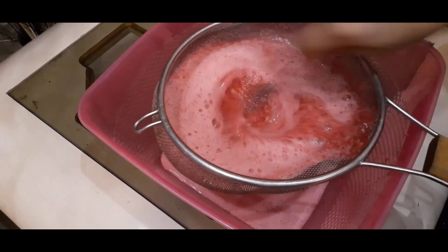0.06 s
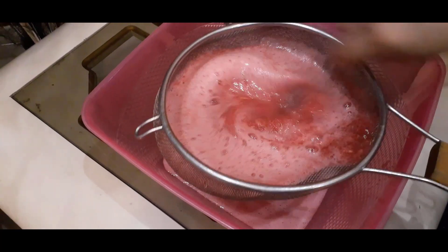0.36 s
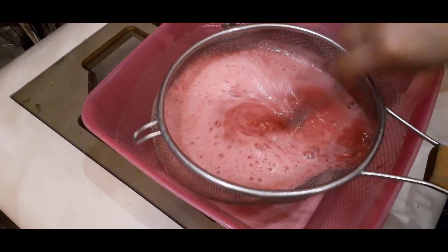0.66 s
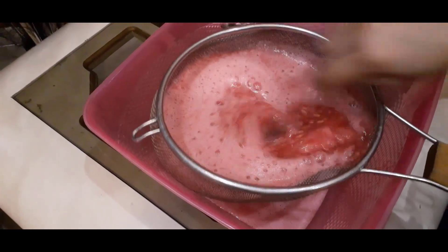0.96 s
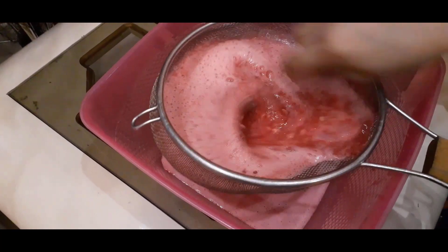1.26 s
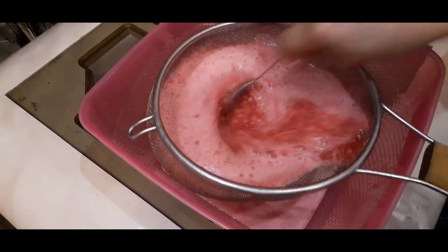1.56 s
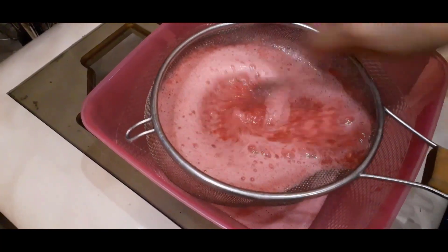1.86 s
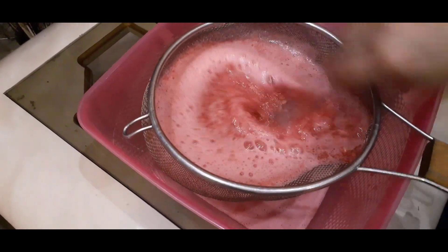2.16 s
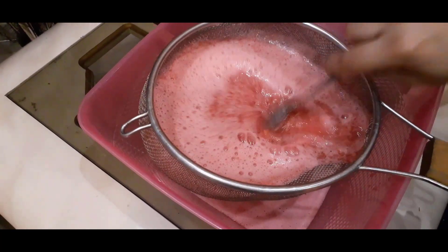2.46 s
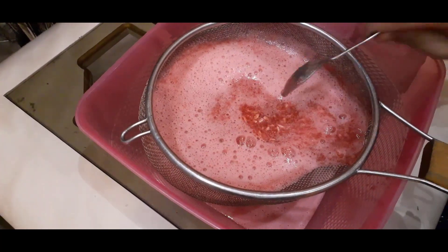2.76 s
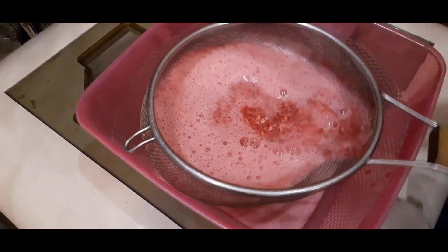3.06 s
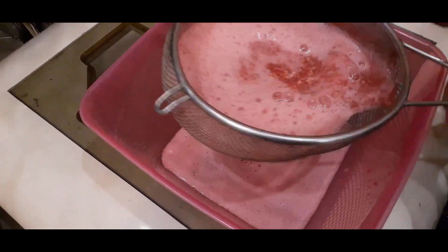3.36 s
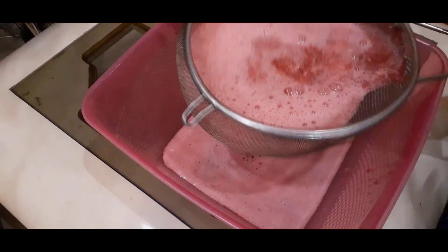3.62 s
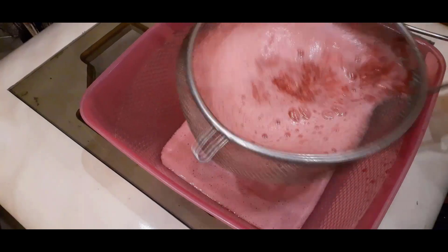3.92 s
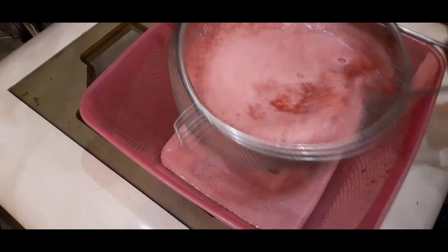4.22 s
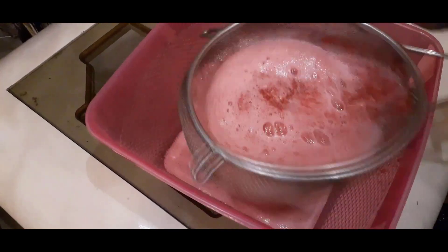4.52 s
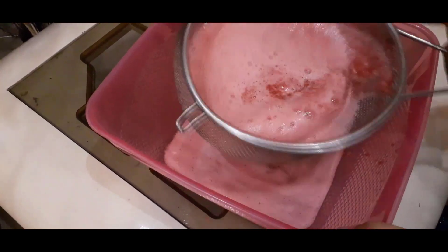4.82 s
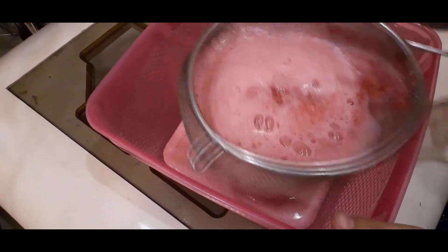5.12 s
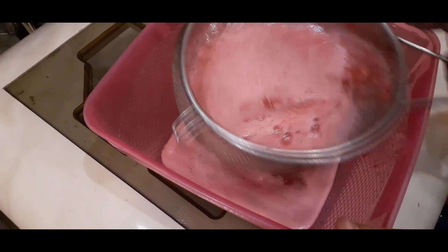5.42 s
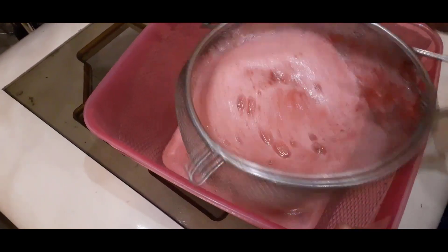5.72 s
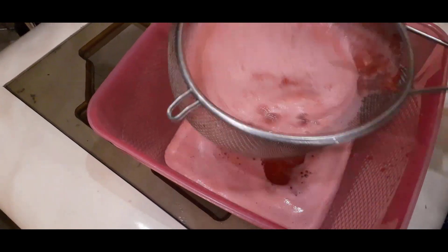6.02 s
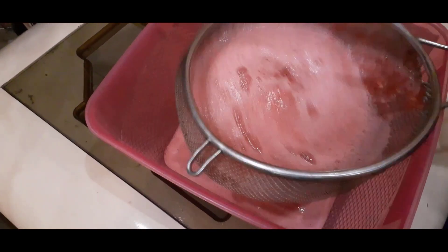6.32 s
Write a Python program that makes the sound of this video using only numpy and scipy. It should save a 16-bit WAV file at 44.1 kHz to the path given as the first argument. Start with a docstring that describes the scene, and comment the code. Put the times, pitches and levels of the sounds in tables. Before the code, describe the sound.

Quick, buzzing, squelchy stirring through metal mesh stops and gives way to scattered drips and plops over a faint kitchen hum.

```python
"""Stirring fruit pulp through a strainer

A spoon stirs wet pulp in a wire strainer over a plastic basin: four turns a second, each a quick push
and a slower return. Its edge buzzes across the wires, gliding with its speed, and the pulp squelches
through. Then the strainer is lifted and rocked: blobs plop and juice drips, over a small kitchen's hum."""
import sys
import numpy as np
from scipy import signal
from scipy.fft import rfft, irfft, next_fast_len
from scipy.io import wavfile
from scipy.ndimage import uniform_filter1d

SR = 44100
rng = np.random.default_rng(int(sys.argv[2]) if len(sys.argv) > 2 else 0)


def wrap_up_sound(samples):
    """Save the sound to the file named by the first command line argument, as 16-bit audio."""
    columns = np.atleast_2d(samples).T
    # keep every value between -1 and 1, then stretch to whole-number steps
    tamed = np.clip(columns, -1, 1)
    steps = np.round(tamed * 32767).astype(np.int16)
    wavfile.write(sys.argv[1], SR, steps)


N = 281358
TIME = np.arange(N) / SR
FREQS_HZ = np.maximum(np.fft.rfftfreq(N, 1 / SR), 1)
SPOON_STOP_S = 2.36


def from_db(db):
    return 10 ** (np.asarray(db) / 20)


def unit_rms(x):
    return x / np.sqrt(np.mean(x ** 2) + 1e-20)


def curve(rows):
    """A (time_s, value) table at every sample."""
    return np.interp(TIME, *np.transpose(rows))


def spectrum_db(points, hz):
    """A (freq_hz, level_db) table at hz, falling 36 dB per octave past its ends."""
    freq_hz, level_db = np.transpose(points)
    octaves_out = np.abs(np.log2(hz / np.clip(hz, freq_hz.min(), freq_hz.max())))
    return np.interp(np.log(hz), np.log(freq_hz), level_db) - 36 * octaves_out


def coloured(x, points):
    """Minimum-phase filter with the given spectrum."""
    n = 2 * next_fast_len(x.shape[-1] // 2 + 2048)
    hz = np.maximum(np.fft.rfftfreq(n, 1 / SR), 1)
    gain = from_db(np.maximum(spectrum_db(points, hz), -80))
    cepstrum = irfft(np.log(gain))
    cepstrum[1:n // 2] *= 2
    cepstrum[n // 2 + 1:] = 0
    return irfft(rfft(x, n) * np.exp(rfft(cepstrum)), n)[..., :x.shape[-1]]


def drift(rate_hz, size=16384):
    """Smooth random wander, RMS 1."""
    hz = np.fft.rfftfreq(size, N / SR / size)
    slow = irfft(rfft(rng.standard_normal(size)) / (1 + (hz / rate_hz) ** 2))
    return np.interp(TIME, np.linspace(0, N / SR, size), unit_rms(slow))


def spread(pair, width):
    """Mid and side to left and right; width scales the side."""
    return pair[0] + width * pair[1] * np.array([[1], [-1]])


def noise(colour, width, n=N):
    """Coloured stereo noise."""
    return coloured(spread(rng.standard_normal((2, n)), width), colour)


def evened(x, window_s=0.018):
    """Hold the short-time level at 1, leaving the fine grain."""
    power = uniform_filter1d(np.mean(x, axis=0) ** 2, int(window_s * SR))
    return x / np.sqrt(np.abs(power) + 1e-14)


def grains(per_s, size_db):
    """Two streams of random impulses of uneven size and either sign."""
    out = np.zeros((2, N))
    chance = rng.random((2, N)) * SR / per_s
    born = chance < 1
    draw = 2 * chance[born] - 1
    size = np.minimum(-np.log(np.abs(draw) + 1e-12), 5)
    out[born] = np.sign(draw) * from_db(size_db * size)
    return out


def patter(colour, per_s, size_db, width):
    """Coloured stereo grains."""
    return coloured(spread(grains(per_s, size_db), width), colour)


def swells(peak_s, heights, rise_s, fall_s):
    """Sum of rounded humps; rise and fall are shared or given per hump."""
    coarse_s = TIME[::32]
    t = coarse_s - np.reshape(peak_s, (-1, 1))
    width_s = np.where(t < 0, np.reshape(rise_s, (-1, 1)), np.reshape(fall_s, (-1, 1)))
    humps = np.exp(-np.abs(t / width_s) ** 1.5)
    return np.interp(TIME, coarse_s, np.atleast_1d(heights) @ humps)


def ring(modes, t, vary_db):
    """Decaying sines of alternating sign, levels scattered by vary_db; peak 1."""
    wave = 0
    for k, (hz, db, t60_s) in enumerate(modes):
        envelope = from_db(db + vary_db * rng.standard_normal() - 60 * t / t60_s)
        wave += (-1) ** k * envelope * np.sin(2 * np.pi * hz * t)
    return wave / np.abs(wave).max()


def add(track, start_s, sound):
    start = int(np.clip(start_s * SR, 0, N - 1))
    track[..., start:start + sound.shape[-1]] += sound[..., :N - start]


def panned(x, left_over_right_db, right_lag_rad=0.0):
    """Level difference and lag between the sides per frequency, at constant power."""
    ratio = from_db(left_over_right_db)
    right = np.ones_like(ratio) * np.exp(-1j * right_lag_rad)
    sides = np.array([ratio, right]) * np.sqrt(2 / (1 + ratio ** 2))
    return irfft(rfft(x) * sides, N)


# appliance levels: time_s, level_db
RUMBLE_LEVEL = [(0.5, -46), (1.35, -42), (2.2, -42.5), (2.45, -47.5), (3.65, -41), (4.45, -47),
                (4.75, -42.5), (5.92, -43.5), (6.1, -48)]
DRONE_LEVEL = [(0, -52), (4.9, -51), (5.5, -47.5), (6.38, -46.5)]
# background spectra: freq_hz, level_db
RUMBLE_COLOUR = [(20, -22), (40, -25.5), (54, 3), (63, -3.5), (75, 4.5), (92, -13.5), (120, -6), (150, -40)]
DRONE_COLOUR = [(100, -21), (135, -7.5), (170, -6), (205, -6.5), (260, -15), (350, -17.5), (520, -33.5),
                (900, -55)]
AIR_COLOUR = [(290, -27), (500, 7), (659, -31), (740, -10.5), (1870, -17.5), (2500, -9), (3290, -18.5),
              (4940, -1.5), (6140, -3), (7530, -17.5), (10500, -14), (14500, -10), (16000, -55)]
def background(drone_gain_db=-3.0, air_db=-60.0):
    """An appliance rumbles and drones under a faint even hiss."""
    rumble = evened(noise(RUMBLE_COLOUR, width=0.066), window_s=0.18)
    drone = evened(noise(DRONE_COLOUR, width=0.24), window_s=0.22)
    air = unit_rms(noise(AIR_COLOUR, width=1.0))
    return (from_db(curve(RUMBLE_LEVEL)) * rumble
            + from_db(curve(DRONE_LEVEL) + drone_gain_db) * drone
            + from_db(air_db) * air)


# appliance tones: pitch_hz, relative_db
MOTOR_TONES = [(60, -9), (120, -23), (161, -5.5), (183, -7)]
def motor():
    """The appliance's tones waver slightly and grow with its drone."""
    tones = sum(from_db(db) * np.sin(2 * np.pi * hz * TIME + 0.37 * drift(6.5)) for hz, db in MOTOR_TONES)
    return np.sqrt(2) * from_db(curve(DRONE_LEVEL)) * tones


# seeping juice: time_s, level_db
SEEP_LEVEL = [(2.3, -83), (2.5, -53.5), (2.75, -82), (3.1, -62.5), (3.45, -54.5), (3.8, -58.5),
              (4.2, -59.5), (4.6, -57.5), (5.25, -54), (6.38, -56.5)]
# strainer shakes: peak_s, level_db
SHAKES = [(3.37, -55), (3.55, -54.5), (4.16, -55.5), (4.28, -53)]
# fizz and fine spray spectra: freq_hz, level_db
SEEP_COLOUR = [(300, 12), (600, 8.5), (1100, 0), (1600, -2), (2700, 6), (4000, -1.5), (5800, -4),
               (8000, -11), (13000, -2.5), (16000, -17)]
SPRAY_COLOUR = [(5000, 1.5), (8000, 1.5), (11000, 5.5), (14000, 9), (16000, -0.5)]
def seeping():
    """Foam bursts and juice creeps through the mesh in a fine fizz; each shake adds a thin sizzle."""
    bursts = spread(grains(8000, size_db=1.5), 0.9) * from_db(2.3 * drift(25))
    fizz = unit_rms(coloured(bursts, SEEP_COLOUR))
    sizzle = unit_rms(patter(SPRAY_COLOUR, per_s=6000, size_db=4.5, width=1.0))
    peak_s, level_db = np.transpose(SHAKES)
    shaking = swells(peak_s, from_db(level_db), rise_s=0.022, fall_s=0.063)
    return from_db(curve(SEEP_LEVEL)) * fizz + shaking * sizzle


# mesh friction spectrum: freq_hz, level_db
SCRAPE_COLOUR = [(2800, -16), (4200, 11), (5300, 11), (6300, 9), (7500, 0)]
def sliding(peak_s=3.21, level_db=-57):
    """Wet mesh brushes the basin in a soft hiss as the strainer is lifted."""
    hiss = unit_rms(noise(SCRAPE_COLOUR, width=1.0))
    return swells(peak_s, from_db(level_db), rise_s=0.073, fall_s=0.041) * hiss


# juice swills: peak_s, level_db
SWILLS = [(3.2, -56), (3.42, -50.5), (3.7, -61), (4.38, -49.5), (4.61, -53.5), (5.26, -48)]
# slosh spectrum: freq_hz, level_db
SLOSH_COLOUR = [(230, -18), (400, -1), (560, -6.5), (750, -11), (1050, -16.5), (1500, -30.5)]
def swilling():
    """A soft wash of small bubbles in the basin."""
    peak_s, level_db = np.transpose(SWILLS)
    wash = unit_rms(patter(SLOSH_COLOUR, per_s=1200, size_db=-1.5, width=0.11))
    return swells(peak_s, from_db(level_db), rise_s=0.064, fall_s=0.047) * wash


# wet clicks, before each part's gain: start_s, splat_db, ping_hz, basin_db, basin_pitch_ratio, spray_db
WET_CLICKS = [(0.105, -22, 5100, -38, 1.2, -64), (0.157, -26.5, 2300, -39, 1.3, -62),
              (0.173, -24.5, 6660, -48, 0.69, -48), (0.6048, -37, 5200, -54, 1.1, -54),
              (0.9724, -49, 5600, -44, 1.11, -57), (1.1059, -31, 5010, -39, 1.5, -58),
              (1.2238, -44, 2930, -37, 0.78, -55), (1.9836, -41, 3000, -50, 1, -60),
              (2.1242, -32, 2873, -41, 1.09, -60), (2.158, -32, 2385, -40, 1.15, -68),
              (2.239, -42, 2906, -38.5, 0.88, -59), (2.39, -30.5, 5900, -70, 1.12, -61),
              (2.434, -40, 2220, -43, 0.92, -65), (2.4843, -42, 2920, -70, 1.09, -70),
              (2.5255, -38.5, 4500, -51, 0.86, -61), (2.612, -43.5, 2305, -51.5, 0.85, -68),
              (3.083, -48, 2700, -76, 0.9, -72), (3.3343, -40, 2710, -55, 0.8, -59),
              (3.384, -36, 2380, -52, 1.16, -68), (3.4268, -31.5, 5870, -70, 1.3, -44.5),
              (3.4805, -46, 2930, -68, 0.92, -59), (3.524, -42, 2860, -46, 0.89, -59),
              (3.5538, -43, 3300, -62, 1, -57), (3.582, -42, 2920, -69, 1, -66),
              (3.639, -32.5, 4930, -56, 1, -46.5), (3.718, -43.5, 6100, -75, 1, -52.5),
              (3.8256, -41, 3080, -54, 0.93, -60), (3.8594, -42.5, 4630, -59, 1, -65),
              (3.92, -35.5, 2920, -46, 1.06, -55), (4.138, -48, 2400, -59, 1.1, -57.5),
              (4.4096, -34, 2980, -52, 1.2, -58), (4.484, -42.5, 2900, -72, 0.79, -70),
              (4.6987, -46, 3100, -68, 0.87, -64), (4.76, -39.5, 2340, -59, 0.7, -68),
              (4.8269, -46, 3200, -66, 1, -64), (4.8408, -26.5, 5640, -44.5, 0.93, -51),
              (4.9232, -38, 2180, -36, 0.96, -71), (4.9525, -39, 2380, -48, 0.89, -60),
              (5.0443, -34.5, 5200, -56, 1.06, -52.5), (5.0608, -38, 2900, -68, 0.89, -64),
              (5.111, -34, 3080, -65, 1.4, -66), (5.131, -36.5, 2940, -50, 0.92, -62),
              (5.228, -40.5, 2350, -37, 0.985, -58), (5.289, -39.5, 2000, -51, 0.96, -71),
              (5.32, -29.5, 2210, -42, 0.87, -54.5), (5.4093, -34.5, 2970, -70, 0.83, -70),
              (5.529, -37, 2400, -44, 0.91, -55.5), (5.5992, -43, 4600, -56, 1.4, -72),
              (5.6315, -31.5, 3050, -35.5, 1.1, -61), (5.721, -35, 2950, -43.5, 0.98, -56),
              (5.733, -45, 3300, -51, 0.84, -57), (5.8325, -39, 2930, -50.5, 1.03, -62),
              (5.9194, -40, 2210, -37.5, 0.98, -58), (5.9847, -41, 2800, -64, 1, -61),
              (6.01, -41, 3050, -62, 1.1, -63), (6.0603, -28.5, 2600, -60, 1.1, -54),
              (6.0708, -28.5, 2350, -37, 1.18, -60), (6.0755, -28, 2760, -54, 1.1, -40.5),
              (6.12, -28.5, 2900, -52, 0.96, -70), (6.1292, -38, 2200, -30, 0.93, -61),
              (6.2378, -39, 2540, -32.5, 1.02, -58), (6.263, -48, 2600, -50, 1.05, -67),
              (6.327, -46.5, 2500, -50, 0.97, -68), (6.3602, -42.5, 5570, -61, 0.91, -55)]
# basin modes before damping: pitch_hz, level_db, t60_s
BASIN_MODES = [(388, -8.5, 0.036), (586, -8.5, 0.038), (805, -0.5, 0.015), (948, 6, 0.026),
               (1230, 1, 0.014), (1540, -5.5, 0.012)]
# impact spectra: freq_hz, level_db
SLAP_COLOUR = [(400, -13), (700, 1), (1050, 13), (1600, -5), (2500, -14)]
SPLAT_COLOUR = [(1200, -41), (2000, -0.5), (2800, 4.5), (4200, -9), (5600, -3.5), (7500, -15.5),
                (11000, -23)]
def wet_clicks(basin_gain_db=5.0, slap_gain_db=-4.5, splat_gain_db=-6.5, spray_gain_db=15.0,
               delay_s=0.001043):
    """Juice drips, plus a few sharp spoon cracks and chirps on the metal: ring, ping and noise bursts."""
    out, t = np.zeros((2, N)), TIME[:SR // 8]
    for start_s, splat_db, ping_hz, basin_db, pitch_ratio, spray_db in WET_CLICKS:
        # light clicks hardly ring; each is tuned a little differently
        sustain = np.interp(basin_db, [-48, -36, -32], [0.45, 0.55, 0.72])
        modes = [(hz * pitch_ratio * (1 + 0.04 * rng.standard_normal()), db, t60_s * sustain)
                 for hz, db, t60_s in BASIN_MODES]
        basin = from_db(basin_db + basin_gain_db) * ring(modes, t, vary_db=2.5)
        ping = from_db(splat_db) * ring([(ping_hz, 0, 0.006)], t, vary_db=0)  # in a drip, a tiny bubble
        click = basin + ping
        for colour, db, decay_s, width in ((SLAP_COLOUR, basin_db + slap_gain_db, 0.0043, 0.45),
                                           (SPLAT_COLOUR, splat_db + splat_gain_db, 0.0022, 1.0),
                                           (SPRAY_COLOUR, spray_db + spray_gain_db, 0.0009, 1.0)):
            burst = unit_rms(coloured(rng.standard_normal((2, len(t))), colour))
            click = click + from_db(db) * spread(burst, width) * np.exp(-t / decay_s)
        add(out, start_s + delay_s, click)
    return out


# falling pulp: start_s, level_db, pitch_hz
BLOBS = [(2.458, -37.5, 349), (3.3672, -17, 368), (4.324, -19, 399), (4.436, -37, 435), (5.228, -34, 420)]
# trapped air modes: pitch_ratio, level_db, t60_s
BLOB_MODES = [(1.0, 8.5, 0.029), (1.25, -4, 0.026), (1.7, -15.5, 0.03), (2.35, -10, 0.02),
              (2.9, -19, 0.033)]
# plop tone colour, rounded mid-range with little bass or treble: freq_hz, gain_db
PLOP_COLOUR = [(200, -15), (330, 2.5), (700, -1), (1100, 0.5), (1600, -18)]
def blobs(slosh_db=-23, slosh_decay_s=0.022, attack_s=0.003):
    """A soft lump lands, the air under it rings briefly, and the juice sloshes back."""
    out, t = np.zeros((2, N)), TIME[:SR // 4]
    attack = 1 - np.exp(-t / attack_s)
    for start_s, level_db, pitch_hz in BLOBS:
        modes = [(pitch_hz * ratio, db, t60_s) for ratio, db, t60_s in BLOB_MODES]
        plop = coloured(ring(modes, t, vary_db=0.7) * attack, PLOP_COLOUR)
        slosh = evened(noise(SLOSH_COLOUR, width=0.7, n=len(t))) * attack * np.exp(-t / slosh_decay_s)
        add(out, start_s, from_db(level_db) * (plop / np.abs(plop).max() + from_db(slosh_db) * slosh))
    return out


# spoon knocks: start_s, level_db, thump_db
KNOCKS = [(0.0902, -10.5, -30), (0.157, -17.5, -26.5), (0.596, -25.5, -46), (0.9724, -30, -57),
          (1.0145, -27.5, -54), (1.036, -31, -54), (2.051, -38, -37)]
# loaded strainer and basin modes: pitch_hz, level_db, t60_s
STRAINER_MODES = [(466, 5.5, 0.014), (640, -13, 0.022), (846, 3.5, 0.036), (1270, 10, 0.005),
                  (1880, -3, 0.0073), (2820, -17, 0.0029), (5700, -9.5, 0.018)]
THUMP_MODES = [(191, 1, 0.055), (238, 1.5, 0.12), (318, -1.5, 0.048)]
# wet pulp spectrum: freq_hz, level_db
SQUELCH_COLOUR = [(880, -3.5), (1500, -5.5), (1790, -3), (2940, 0), (4040, -6.5), (6060, -7.5), (6690, -16),
                  (7320, -19.5), (8080, -14), (9100, -20), (11900, -13.5), (12900, -17.5), (13800, -8),
                  (16000, -24)]
def knocks(crack_db=-12.5, crack_decay_s=0.0023):
    """The spoon cracks against the strainer and thumps the basin; pulp damps the ring at once."""
    out, t = np.zeros((2, N)), TIME[:SR // 5]
    for start_s, level_db, thump_db in KNOCKS:
        burst = unit_rms(coloured(rng.standard_normal((2, len(t))), SQUELCH_COLOUR))
        crack = from_db(crack_db) * burst * np.exp(-t / crack_decay_s)
        add(out, start_s, from_db(level_db) * (ring(STRAINER_MODES, t, vary_db=8.5) + crack))
        add(out, start_s, from_db(thump_db) * ring(THUMP_MODES, t, vary_db=0))
    return out


# spoon on bare metal: peak_s, level_db, rise_s, fall_s
GRATES = [(0.094, -38, 0.0025, .005), (.107, -39, 0.0028, 0.01), (.126, -41, .003, 0.0049),
          (0.175, -45, 0.0099, 0.0092), (.222, -41.5, 0.042, 0.017)]
def grating():
    """Steel slips on steel in a short bright rasp."""
    peak_s, level_db, rise_s, fall_s = np.transpose(GRATES)
    rasp = evened(patter(SCRAPE_COLOUR, per_s=3000, size_db=3.0, width=1.0))
    return swells(peak_s, from_db(level_db), rise_s, fall_s) * rasp


# juice sprays: peak_s, level_db, rise_s, fall_s
SPRAYS = [(.026, -38, 0.017, 0.013), (.235, -42, 0.059, 0.019), (.806, -38.5, 0.017, 0.01),
          (1.039, -34, 0.006, 0.017), (1.11, -41, 0.013, 0.016), (1.295, -42.5, 0.026, 0.054),
          (1.553, -41.5, 0.028, .02), (1.625, -45, 0.029, 0.019), (2.061, -40, 0.015, 0.021),
          (1.92, -51, 0.028, 0.031), (2.19, -47.5, 0.019, .02), (2.322, -41.5, 0.011, 0.017),
          (2.408, -62, 0.058, 0.064)]
# crackle spectrum: freq_hz, level_db
CRACKLE_COLOUR = [(1800, 13), (3000, 12.5), (5500, 1.5), (7300, -12), (8200, 3), (10000, -7), (12000, 0.5),
                  (14000, 4.5), (16000, -13)]
def spraying():
    """Juice forced through the wires breaks into a crisp crackle."""
    peak_s, level_db, rise_s, fall_s = np.transpose(SPRAYS)
    crackle = evened(patter(CRACKLE_COLOUR, per_s=2500, size_db=5.0, width=0.8), window_s=0.016)
    return swells(peak_s, from_db(level_db), rise_s, fall_s) * crackle


# air pocket spectrum: freq_hz, level_db
POCKET_COLOUR = [(1200, -6), (1800, 3), (2900, 2.5), (4000, -40)]
def pockets(count=14, wander_db=7.0):
    """Air pockets open and close in the pulp, so the crackle rings at shifting pitches."""
    out = 0
    for hz in np.geomspace(1300, 3800, count):
        bursts = spread(grains(500, size_db=1.5), 0.28)
        bursts *= from_db(spectrum_db(POCKET_COLOUR, hz) + wander_db * drift(10.4))
        out = out + signal.lfilter(*signal.iirpeak(hz, Q=16, fs=SR), bursts + 1e-18)
    return unit_rms(out)


def gurgles(count=240, low_hz=680, high_hz=1280, t60_cycles=24, glide_per_s=5.4, attack_s=0.002):
    """Bubbles torn open by the spoon ring briefly, each gliding up or down."""
    out, t = np.zeros((2, N)), TIME[:SR // 25]
    for when, pitch, glide, size, side in rng.random((count, 5)):
        hz = low_hz * (high_hz / low_hz) ** pitch
        phase = 2 * np.pi * hz * t * (1 + (2 * glide - 1) * glide_per_s * t)
        envelope = (1 - np.exp(-t / attack_s)) * from_db(9 * size - 60 * t * hz / t60_cycles)
        add(out, when * SPOON_STOP_S, np.outer([0.5 + side, 1.5 - side], envelope * np.sin(phase)))
    return unit_rms(out)


# pushes: peak_s, top_delay_s, top_wires_per_s, swing_s, buzz_db, spurt_delay_s,
# rasp_db, crackle_db, squelch_db
PUSHES = [(0.007, -0.0014, 595, 0.055, -25.5, 0.012, -37.5, -37.5, -42),
          (0.243, 0.0088, 582, 0.046, -25, 0.013, -39.5, -38, -40),
          (0.502, 0.0066, 548, 0.051, -31, 0.022, -37.5, -37, -46.5),
          (0.768, 0.025, 595, 0.067, -28, 0.018, -37.5, -47.5, -45.5),
          (1.026, 0.015, 590, 0.055, -34.5, 0.02, -36.5, -47, -46),
          (1.268, 0.012, 548, 0.054, -33.5, 0.015, -36, -48, -44.5),
          (1.52, 0.015, 505, 0.055, -35, 0.028, -35.5, -37.5, -41.5),
          (1.768, 0.018, 530, 0.056, -37, 0.028, -38.5, -38.5, -43),
          (2.039, 0.0077, 612, 0.05, -27, 0.019, -35.5, -40, -41.5),
          (2.296, 0.019, 585, 0.044, -35, 0.016, -38, -48, -46)]
# lighter returns: peak_s, top_delay_s, top_wires_per_s, swing_s, buzz_db, spurt_length_ratio,
# rasp_db, crackle_db, squelch_db
RETURNS = [(0.116, -0.0019, 400, 0.06, -30.5, 0.87, -46, -42.5, -45),
           (0.367, 0.00063, 438, 0.062, -27.5, 1, -43, -48.5, -43),
           (0.648, 0.0024, 453, 0.062, -28, 0.91, -41.5, -43, -45.5),
           (0.897, -0.012, 470, 0.05, -37.5, 1, -48.5, -46, -48.5),
           (1.14, -0.00066, 456, 0.06, -34, 1, -43, -48.5, -46),
           (1.402, 0.01, 415, 0.06, -35.5, 1, -48, -49, -51.5),
           (1.652, 0, 445, 0.055, -31, 0.93, -42, -45, -47),
           (1.906, 0.013, 430, 0.07, -32.5, 0.95, -43.5, -42.5, -44.5),
           (2.165, -0.005, 450, 0.05, -42.5, 0.88, -45, -45, -52)]
# spoon stalls at the turns: time_s, gain_db
STALLS = [(.58, 0), (.715, -4), (.858, 1), (.96, -5), (1.003, -6), (1.085, -1), (1.209, -2), (1.352, 0),
          (1.47, 0), (1.6, -4), (1.725, -3), (1.853, -7.5), (1.98, -2), (2.114, -6), (2.28, -6.5)]
def stroke_levels(swirl_db=(-50, -60, -69, -55.5), settle_s=0.16, lumps_db=1.16, lumps_hz=25.3):
    """Buzz, rasp, crackle and squelch envelopes: strokes over swirling pulp, made uneven by lumps."""
    push_s, _, _, _, push_buzz_db, spurt_delay_s, *push_wet_db = np.transpose(PUSHES)
    back_s, _, _, _, back_buzz_db, length, *back_wet_db = np.transpose(RETURNS)
    buzz = (swells(push_s, from_db(push_buzz_db), rise_s=0.025, fall_s=0.025)
            + swells(back_s, from_db(back_buzz_db), rise_s=0.027, fall_s=0.054))
    wet = [swells(push_s + spurt_delay_s, from_db(push_db), rise_s=0.034, fall_s=0.03)
           + swells(back_s, from_db(back_db), rise_s=0.059 * length, fall_s=0.095 * length)
           for push_db, back_db in zip(push_wet_db, back_wet_db)]
    settling = np.exp(-np.maximum(TIME - SPOON_STOP_S, 0) / settle_s)
    swirl = np.outer(from_db(swirl_db), settling)
    stall_db = swells(*np.transpose(STALLS), rise_s=0.012, fall_s=0.016)
    return (np.array([buzz, *wet]) + swirl) * from_db(stall_db + lumps_db * drift(lumps_hz))


def spoon_speed(turn_wires_per_s=260.0):
    """Wires crossed per second: each stroke is an arch, at half speed one swing from its top."""
    speed = np.full(N, turn_wires_per_s)
    for peak_s, top_delay_s, top_wires_per_s, swing_s, *_ in PUSHES + RETURNS:
        arch = 1 - 0.5 * ((TIME - peak_s - top_delay_s) / swing_s) ** 2
        speed = np.maximum(speed, top_wires_per_s * arch)
    return speed


# spoon-on-mesh spectra: freq_hz, level_db
BUZZ_COLOUR = [(150, -13.5), (260, -5.5), (340, 1), (430, 4), (505, 4), (590, 10), (720, -5.5), (900, -30)]
RASP_COLOUR = [(550, -19), (750, -13.5), (1000, 0), (1200, -10.5), (1550, -29), (2000, -20.5)]
def stirring(jitter=0.07, uneven_db=3.0, clump_db=2.0, gurgle_db=-6.5, rasp_gain_db=2.0):
    """The spoon's edge snaps from wire to wire; every snap squeezes pulp through the mesh."""
    buzz_level, rasp_level, crackle_level, squelch_level = stroke_levels()
    travel_wires = np.cumsum(spoon_speed() * (1 + jitter * drift(100))) / SR
    crossings = np.diff(np.floor(travel_wires), prepend=0)
    snaps = unit_rms(crossings * from_db(uneven_db * drift(170)))
    squeeze = 1 + 0.11 * np.cos(2 * np.pi * travel_wires)
    spurts = unit_rms(grains(6000, size_db=3.5) * squeeze * from_db(clump_db * drift(48)))
    # pressed hard the spoon bites the wires; pressed lightly it skids on pulp
    skid = np.interp(buzz_level, from_db([-44, -30]), [0.9, 0.45])
    buzz = evened(coloured(snaps + skid * spread(spurts, 0.028), BUZZ_COLOUR))
    rasp = unit_rms(coloured(snaps + spread(spurts, 0.34), RASP_COLOUR))
    wet_rasp = evened(rasp + from_db(gurgle_db) * gurgles())
    crackle = evened(pockets(), window_s=0.025)
    squelch = evened(coloured(0.6 * snaps + spread(spurts, 1.0), SQUELCH_COLOUR), window_s=0.089)
    return (buzz_level * buzz + from_db(rasp_gain_db) * rasp_level * wet_rasp
            + crackle_level * crackle + squelch_level * squelch)


# echo response: freq_hz, gain_db
WALL_COLOUR = [(100, -1), (450, 4), (1000, 5.5), (3000, 0), (8000, 4), (16000, -4.5)]
def kitchen(x, t60_s, tail_db, near_db, near_decay_s=0.0082):
    """Quick reflections from basin and counter, then a short room tail, different at each ear."""
    t = TIME[:SR // 2]
    near = rng.standard_normal((2, len(t))) * np.exp(-t / near_decay_s) * (t > 0.001)
    tail = rng.standard_normal((2, len(t))) * from_db(-60 * t / t60_s) * (t > 0.006)
    echo = (from_db(near_db) * unit_rms(near) + from_db(tail_db) * unit_rms(tail)) / np.sqrt(len(t))
    return x + signal.fftconvolve(x, coloured(echo, WALL_COLOUR), axes=-1)[:, :N]


# spoon's stereo image: freq_hz, left_over_right_db, right_lag_rad
SPOON_IMAGE = [(360, 0, 0), (470, -3, -.1), (497, -5.5, .2), (520, -2, 1.35), (560, 2.5, 1.45),
               (600, 7.5, 2.5), (625, 9, 4.9), (700, 0, 5.2), (755, -2.5, 5.5), (810, -2, 6.3),
               (900, -1.5, 6.7), (1050, 0, 6.28)]
def counter_reflection(x):
    """Direct sound and its reflection off the counter combine differently at each ear."""
    hz, balance_db, lag_rad = np.transpose(SPOON_IMAGE)
    return panned(x, np.interp(FREQS_HZ, hz, balance_db), np.interp(FREQS_HZ, hz, lag_rad))


def scene():
    """The work at the strainer and the drips below it, in the kitchen."""
    spoon = kitchen(stirring() + spraying() + grating(), t60_s=0.26, tail_db=-17.0, near_db=-21.5)
    thuds = kitchen(knocks() + blobs(), t60_s=0.25, tail_db=-10.0, near_db=-16.0)
    clicks = kitchen(wet_clicks(), t60_s=0.2, tail_db=-14.0, near_db=-12.0)
    bed = swilling() + sliding() + seeping() + background() + motor()
    return counter_reflection(spoon) + thuds + clicks + bed


# microphone port balance: freq_hz, left_over_right_db
PORT_BALANCE = [(200, 0), (600, 0.5), (1000, 0.5), (1800, 1.5), (2900, 12.5), (4000, 5.5), (5800, 11),
                (7000, 2), (8400, -24), (10000, -6.5), (12500, 2.5), (14000, 3.5), (16000, 11)]
def record(dry, cutoff_hz=16200):
    """The left port's resonance and notch tilt the stereo balance; a steep low-pass cuts the top."""
    hz, balance_db = np.transpose(PORT_BALANCE)
    heard = panned(dry, np.interp(np.log(FREQS_HZ), np.log(hz), balance_db))
    return signal.sosfilt(signal.ellip(10, 0.1, 80, cutoff_hz, fs=SR, output="sos"), heard)


dry = scene()
out = record(dry)
wrap_up_sound(out)
```